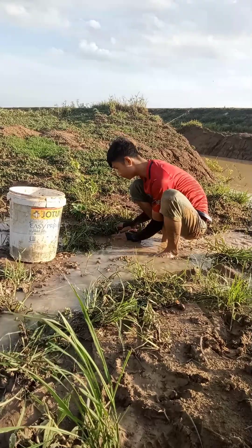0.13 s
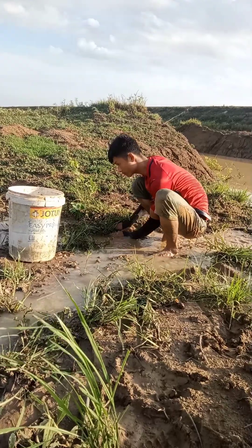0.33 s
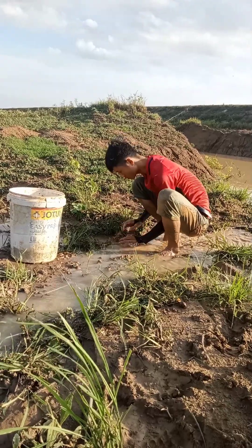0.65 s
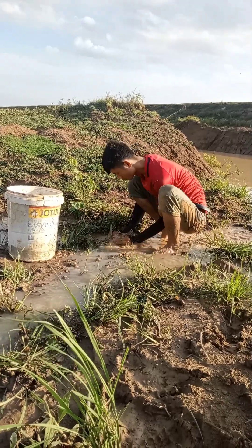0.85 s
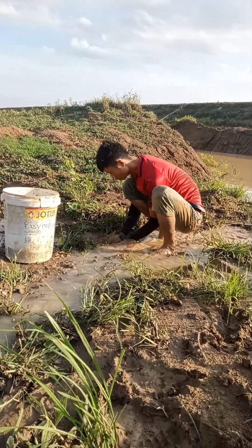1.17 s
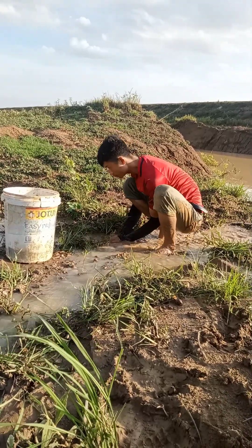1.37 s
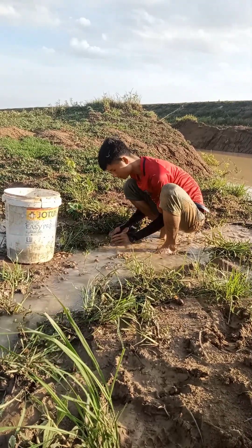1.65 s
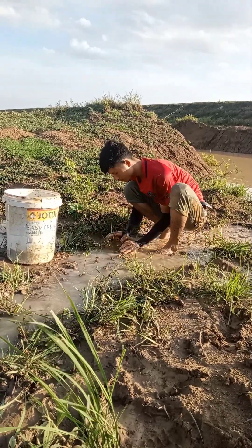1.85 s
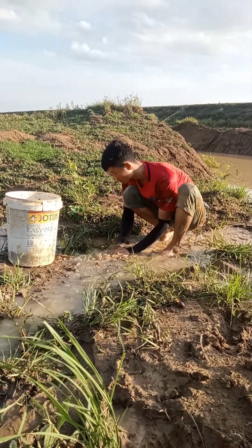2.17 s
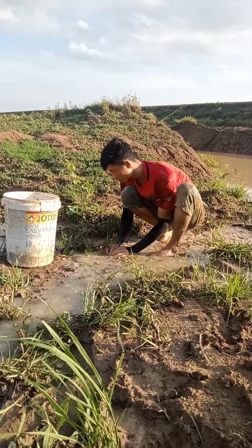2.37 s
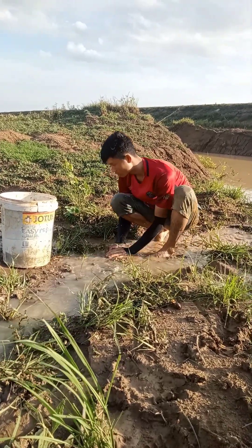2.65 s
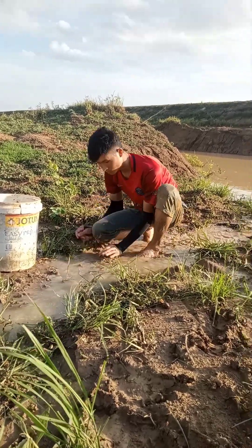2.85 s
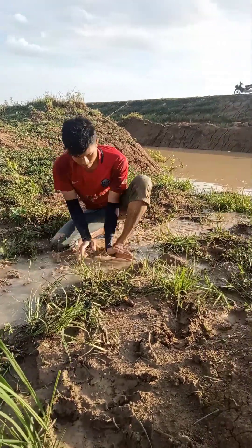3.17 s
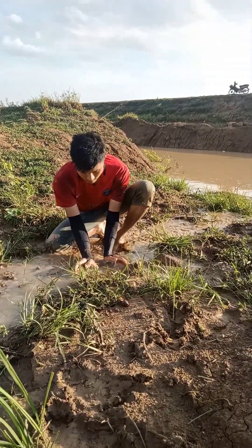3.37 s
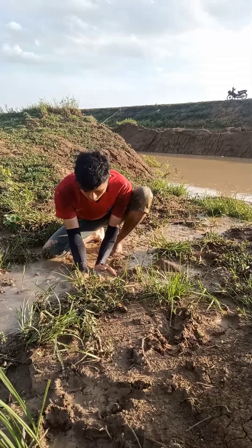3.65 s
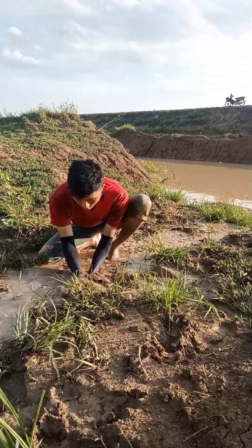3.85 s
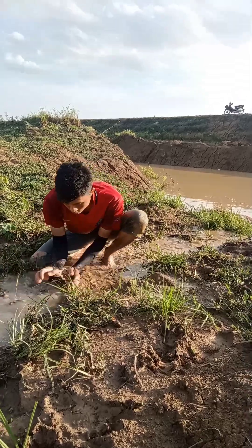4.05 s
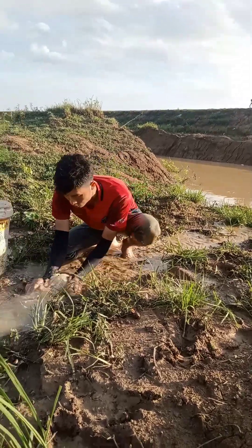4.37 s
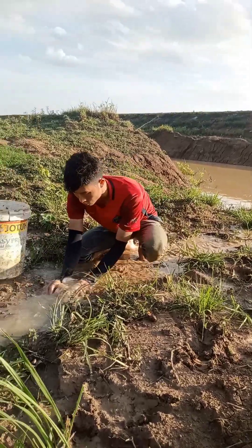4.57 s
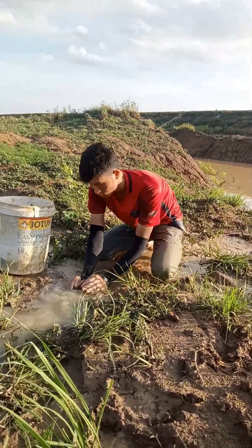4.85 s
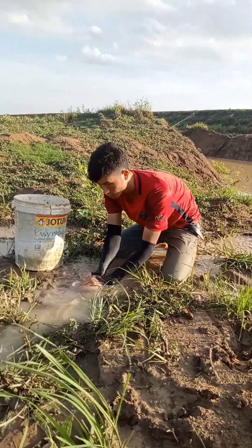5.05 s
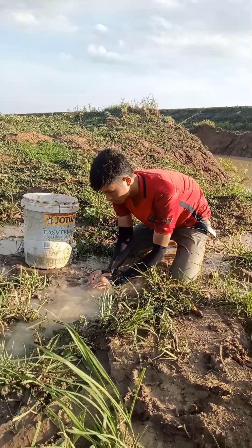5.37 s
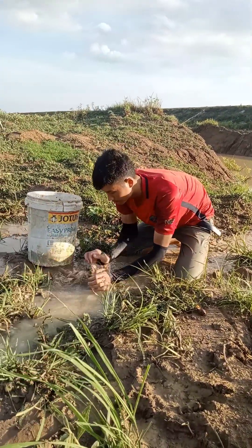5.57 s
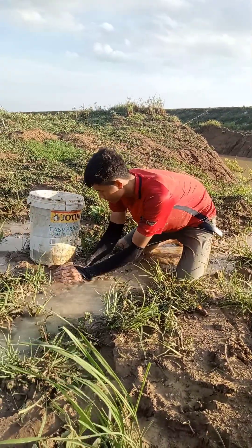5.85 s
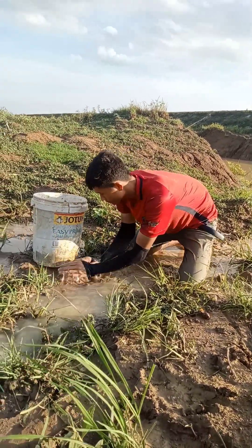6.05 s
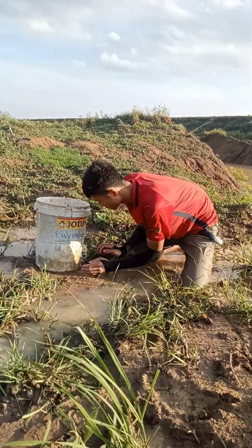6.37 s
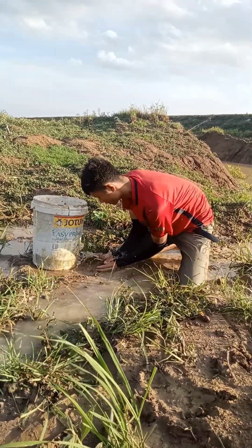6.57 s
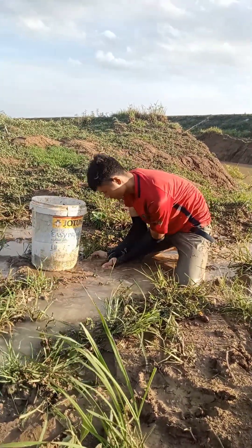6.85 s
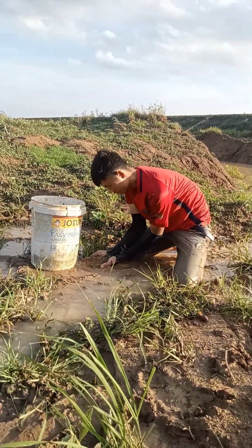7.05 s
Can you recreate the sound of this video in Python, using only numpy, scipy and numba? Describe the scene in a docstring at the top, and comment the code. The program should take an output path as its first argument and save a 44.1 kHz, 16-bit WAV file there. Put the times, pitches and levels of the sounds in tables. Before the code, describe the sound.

Outdoors with no echo, shallow water gurgles quietly under working hands. One bright plink rings out early, then low wind buffeting builds and dominates, easing near three seconds. The water then comes forward with crisp smacks, spatter and bubbly sloshing, fullest past four seconds. More plinks follow near the end among irregular gusts. A thin insect buzz is heard only at the opening. Phone microphone, with little deep bass.

```python
"""Hands scoop and slosh shallow muddy water in an open field, a few metres from a phone in a gusty breeze.
Water: crowds of gliding damped sines (bubbles) over crackling hiss; clear plinks, noise-and-bubble sprays
and unpitched droplet smacks stand out of it.
Wind buffets the microphone port in low thuds: noise through moving low-passes, scaled by draught and puffs.
An insect, a narrow band of noise, buzzes faintly at the start."""
import sys
import numpy as np
from scipy import signal
from scipy.fft import rfft, irfft
from scipy.io import wavfile
from scipy.ndimage import uniform_filter1d
from numba import njit

SR = 44100
rng = np.random.default_rng(int(sys.argv[2]) if len(sys.argv) > 2 else 0)


def how_loud(loudness_db):
    """Turn decibels into a plain amplitude multiplier (0 dB gives 1, 20 dB gives 10)."""
    steps = np.asarray(loudness_db, float) / 20
    return 10 ** steps


def pcm_store(signal):
    """Save signal as 16-bit PCM."""
    levels = np.round(np.clip(np.atleast_2d(signal), -1, 1) * 32767)
    wavfile.write(sys.argv[1], SR, levels.astype(np.int16).T)


N = 318381

# stirred water: [t/s, churn level/dB, fizz over churn/dB]
STIRRING = [(0.0, -46.5, -2), (0.9, -44.5, -2), (1.69, -47.5, 0), (2.09, -45.5, 0), (2.35, -46.5, -2),
            (2.73, -55.5, 3.5), (2.95, -45.5, -4.5), (3.35, -44.5, 4.5), (3.6, -44.5, -3.5), (3.88, -46, 0),
            (4.3, -42.5, -0.5), (4.58, -45.5, -2.5), (5.0, -46, 2), (5.33, -45, -3.5), (5.63, -47, 0),
            (6.51, -44, -3), (7.22, -45.5, -2.5)]
# relative colour of the water at the phone: [f/Hz, gain/dB]
WATER_COLOUR = [(250, -10), (480, 3.5), (800, -3), (1280, -11.5), (1600, -5), (2300, -7), (3100, -2.5),
                (3900, -9.5), (4800, -24), (6600, -24), (8300, -23), (9400, -18.5), (12000, -29),
                (15500, -33)]


def level(x, db):
    """Scale to an rms level in dB."""
    return x * how_loud(db) / np.sqrt(np.mean(x ** 2))


def curves(table):
    """Columns of a table, interpolated to every sample."""
    s, *columns = np.transpose(table)
    return [np.interp(np.arange(N) / SR, s, c) for c in columns]


def walk(rate_hz):
    """Random levels held 1 / rate_hz and slewed twice; spread near 1."""
    k = int(SR / rate_hz)
    held = np.repeat(rng.standard_normal(N // 50), k)[:N]
    return 1.3 * uniform_filter1d(uniform_filter1d(held, k), k)


def waver(spread_db, rate_hz):
    """A walk in dB that keeps the mean power."""
    return spread_db * walk(rate_hz) - spread_db ** 2 * np.log(10) / 20


def colour(x, table):
    """Short causal minimum-phase filter with the gain of (Hz, dB) points."""
    hz, db = np.transpose(table)
    log_hz = np.log(np.linspace(1, SR / 2, 1025))
    log_gain = np.interp(log_hz, np.log(hz), db) * np.log(10) / 20
    # fold the cepstrum onto positive time
    cepstrum = irfft(log_gain)
    cepstrum[1:1024] *= 2
    cepstrum[1025:] = 0
    impulse = irfft(np.exp(rfft(cepstrum)))
    return signal.fftconvolve(x, impulse)[:N]


def tilted_water(db_per_octave):
    """Water colour tilted about 3 kHz."""
    return [(hz, db + db_per_octave * np.log2(hz / 3000)) for hz, db in WATER_COLOUR]


def butter(x, order, hz, kind="low"):
    """Causal Butterworth filter."""
    return signal.sosfilt(signal.butter(order, hz, kind, fs=SR, output="sos"), x)


@njit
def low_pass(x, hz, damp):
    """State-variable low-pass whose corner moves every sample."""
    y, b, l = np.empty(len(x)), 0., 0.
    for i in range(len(x)):
        g = np.tan(np.pi * hz[i] / SR)
        v = (b + g * (x[i] - l)) / (1 + g * (g + damp))
        y[i] = l + g * v
        b, l = 2 * v - b, 2 * y[i] - l
    return y


@njit
def rings(n, s, size, hz, t60, rise, glide):
    """Damped sines that swell within rise seconds; pitch glides by a factor per t60."""
    out = np.zeros(n)
    for k in range(len(s)):
        start, length = int(s[k] * SR), int((t60[k] + rise[k]) * SR)
        phase = 0.
        for i in range(min(length, n - start)):
            t = i / SR
            phase += 2 * np.pi * hz[k] * glide[k] ** (t / t60[k]) / SR
            swell = np.sin(np.pi / 2 * min(t / rise[k], 1.)) ** 2
            decay = 1000. ** (-max(t - rise[k], 0.) / t60[k])
            out[start + i] += size[k] * swell * decay * np.sin(phase)
    return out


def bubbles(count, low_hz, high_hz, cycles, scatter_db):
    """A crowd of small bubbles: many weak, a few strong, each rising in pitch as it nears the surface."""
    when, pitch, strength, life = rng.random((count, 4)).T
    hz = low_hz * (high_hz / low_hz) ** pitch
    t60 = cycles * (0.98 + life) / hz
    # shorter rings get more size so that every pitch carries a like share per Hz
    size = how_loud(-scatter_db * np.log(1 - 0.995 * strength)) * hz / 1000
    return level(rings(N, when * N / SR, size, hz, t60, 0.088 * t60, 1 + 0.44 * life), 0)


def insect():
    """A narrow band of wing rasp, far off in the grass."""
    # buzzes: [start/s, end/s]
    buzzes = [(0, 0.056), (.13, .33)]
    centre_hz, width_hz, rasp_db = 8200, 520, -63
    t = np.arange(N) / SR
    on = sum((t >= a) * (t < b) for a, b in buzzes) * 1.0
    on = uniform_filter1d(on, int(0.01 * SR))
    edges_hz = [centre_hz - width_hz / 2, centre_hz + width_hz / 2]
    rasp = butter(rng.standard_normal(N), 2, edges_hz, "band")
    return on * level(rasp, rasp_db)


def wind():
    """Turbulence at the port: a draught with puffs on top; quicker eddies lift the corner of the rumble."""
    # strongest puffs on the port: [centre t/s, level/dB, length/s]
    puffs = [(0.113, -27, 0.021), (0.449, -32.5, 0.038), (0.715, -16, 0.021), (0.81, -26, 0.05),
             (0.903, -12.5, 0.012), (1.045, -15.5, 0.04), (1.131, -19.5, 0.013), (1.2, -12, 0.029),
             (1.272, -18.5, 0.017), (1.381, -15.5, 0.029), (1.486, -27, 0.018), (1.571, -22.5, 0.028),
             (1.63, -13, 0.0076), (1.662, -15, 0.033), (1.727, -16, 0.032), (1.869, -18.5, 0.074),
             (1.987, -20.5, 0.052), (2.059, -17.5, 0.038), (2.211, -16.5, 0.017), (2.227, -12, 0.0094),
             (2.268, -14.5, 0.022), (2.352, -9, 0.037), (2.411, -12.5, 0.024), (2.454, -16.5, 0.0074),
             (2.52, -11, 0.017), (2.545, -10, 0.013), (2.57, -8.5, 0.016), (2.611, -15, 0.017),
             (2.767, -26, 0.017), (3.211, -22, 0.045), (3.425, -36, 0.013), (3.511, -20.5, 0.026),
             (3.633, -27.5, 0.081), (3.779, -17.5, 0.02), (4.169, -17.5, 0.012), (4.238, -17, 0.005),
             (4.24, -18, 0.037), (4.323, -17.5, 0.034), (4.569, -13, 0.0094), (4.664, -25, 0.1),
             (4.739, -23.5, 0.012), (5.12, -11.5, 0.038), (5.37, -23, 0.068), (5.517, -14.5, 0.028),
             (5.551, -16.5, 0.016), (5.618, -19.5, 0.024), (5.669, -10.5, 0.05), (5.684, -8, 0.0095),
             (5.765, -14.5, 0.024), (5.851, -18.5, 0.058), (5.888, -16.5, 0.0084), (5.907, -9, 0.02),
             (6.028, -23.5, 0.0058), (6.081, -16.5, 0.018), (6.234, -13.5, 0.047), (6.301, -18, 0.0075),
             (6.402, -18, 0.023), (6.53, -6.5, 0.024), (6.728, -22.5, 0.01), (6.79, -19, 0.077),
             (6.933, -22.5, 0.017), (7.062, -18.5, 0.016), (7.161, -11.5, 0.015), (7.201, -18.5, 0.02)]
    # breeze over the port: [t/s, steady draught level/dB, small quick eddies in the puffs/dB]
    draught = [(0.0, -49, -27), (0.66, -46, -21), (0.95, -31.5, -16.5), (1.62, -24, -8), (1.95, -26, -17.5),
               (2.2, -21, -7.5), (2.4, -30.5, -15), (2.57, -17, -1), (2.8, -33, -19.5), (3.01, -42, -29),
               (3.5, -33, -22.5), (3.92, -30, -24.5), (4.2, -21, -9.5), (4.54, -23, -15.5),
               (4.78, -42, -20), (5.25, -37.5, -15.5), (5.4, -24.5, -13), (5.9, -34.5, -10),
               (6.3, -28.5, -13), (7.02, -36.5, -15), (7.22, -33, -10)]
    draught_quick_db, rumble_db, flutter_db = -16, -53, 2.5
    # puff shape, in puff lengths: sharpness of the front, power and fading of the wake
    puff_sharp, wake_share, wake_fade = 2.14, 0.12, 1.76
    port_cut_hz, cavity_hz = 78.2, 850

    draught_db, eddy_db = curves(draught)
    draught_db = draught_db + waver(3.5, 35)
    power = how_loud(draught_db) ** 2
    # power-weighted eddy dB; a stronger draught sheds more small eddies
    quick = power * (draught_quick_db + 0.65 * (draught_db + 24.0))
    t = np.arange(N) / SR
    for s, db, length in puffs:
        near = slice(max(int((s - 2 * length) * SR), 0), int((s + 4 * length) * SR))
        age = (t[near] - s) / length
        # a peaked front, then the wake
        front = np.exp(-(puff_sharp * age) ** 2)
        wake = wake_share * (age > 0) * (1 - np.exp(-3 * age ** 2)) * np.exp(-wake_fade * age)
        puff = how_loud(db) ** 2 * (front + wake)
        power[near] += puff
        # short puffs are sharper
        quick[near] += puff * (eddy_db[near] + 2.06 * np.log2(0.026 / length))

    corner_hz = np.clip(420 * how_loud(0.57 * quick / power), 60, 900)
    eddies = low_pass(rng.standard_normal(N), 0.77 * corner_hz, 1.6)
    eddies = low_pass(eddies, 1.655 * corner_hz, 1.0)
    eddies = butter(eddies, 2, port_cut_hz, "high")
    # even out the swings, so that the air speed alone sets their strength
    window = int(0.024 * SR)
    eddies /= np.sqrt(uniform_filter1d(uniform_filter1d(eddies ** 2, window), window))
    # the largest swings overshoot into sharp spikes
    eddies = level(np.sinh(0.6 * eddies), 0)
    # the port cavity smooths the quickest swings
    eddies = butter(eddies, 3, cavity_hz)
    far = butter(rng.standard_normal(N), 2, 110)
    # the puffs break up into quick flutters
    return eddies * np.sqrt(power) * how_loud(waver(flutter_db, 90)) + level(far, rumble_db)


def ticks():
    """Droplet smacks: dry broad unpitched cracks; random weaker ones are stronger where the churn is loud."""
    # single droplets smacking mud or skin: [t/s, envelope peak before the noise level/dB]
    smacks = [(2.1774, -32), (3.0649, -22), (3.3603, -27), (3.4265, -26), (3.6546, -24), (3.9739, -23.5),
              (4.118, -21), (4.2515, -23.5), (4.3527, -28), (4.4075, -21.5), (5.072, -26), (5.583, -29),
              (5.6301, -25), (5.6475, -22), (6.266, -31), (6.4384, -37)]
    decay_s, stray_db, noise_db = 0.0018, -36.5, -7.0
    when, strength = rng.random((260, 2)).T
    at = (when * (N - 1)).astype(int)
    churn_db = curves(STIRRING)[0][at]
    strays_db = stray_db + churn_db + 45 - 3.0 * np.log(1 - 0.97 * strength)
    s, peak_db = np.transpose(smacks)
    hits = np.zeros(N)
    hits[np.r_[at, (s * SR).astype(int)]] = how_loud(np.r_[strays_db, peak_db])
    shape = signal.lfilter([1], [1, -np.exp(-1 / (decay_s * SR))], hits)
    return shape * level(colour(rng.standard_normal(N), tilted_water(2.23)), noise_db)


def sprays():
    """Short bursts of droplets: a quick front, a crackling tail."""
    # water flung off the hands: [t/s, envelope peak/dB, length/s]
    bursts = [(0.192, -40, 0.019), (0.838, -37, 0.015), (0.854, -23.5, 0.0046), (1.939, -36, 0.027),
              (1.944, -21, 0.0027), (2.993, -43.5, 0.11), (3.223, -43.5, 0.034), (3.252, -34, 0.02),
              (3.467, -39.5, 0.025), (4.124, -41.5, 0.026), (4.358, -36.5, 0.029), (4.42, -54, 0.025),
              (4.949, -34.5, 0.025), (5.752, -28.5, 0.014), (6.5106, -36.5, 0.027)]
    t, shape = np.arange(N) / SR, np.zeros(N)
    for s, peak_db, length in bursts:
        age = np.clip((t - s) / length, -6, 12)
        shape += how_loud(peak_db) * np.where(age < 0, np.exp(-(3 * age) ** 2), np.exp(-age))
    crackle = rng.standard_normal(N) * how_loud(3.5 * walk(400))
    beads = bubbles(count=3500, low_hz=1500, high_hz=15000, cycles=24., scatter_db=3.0)
    droplets = level(crackle, -4) + beads
    return shape * level(colour(droplets, tilted_water(4.7)), 1.0)


def plinks():
    """Each drop lands with a snap, traps one clear bubble and spatters weaker ones of other sizes after it."""
    # clearest bubbles trapped by drops and fingers: [t/s, peak/dB, f/Hz]
    landings = [(0.724, -36, 1080), (0.8543, -5, 3040), (0.94, -33, 1630), (1.056, -28, 3010),
                (1.334, -36, 12000), (1.42, -25.5, 2820), (1.971, -30, 4050), (2.145, -24, 483),
                (3.008, -25, 2230), (3.064, -32.5, 875), (3.083, -31.5, 2270), (3.236, -33, 10500),
                (3.253, -22, 3440), (3.488, -34, 11100), (3.566, -27, 3020), (3.789, -33, 870),
                (3.986, -35.5, 1390), (4.353, -19.5, 2050), (4.354, -23.5, 2960), (4.418, -36, 3430),
                (4.512, -31, 720), (4.519, -25, 2230), (4.628, -33.5, 2200), (4.945, -28, 4130),
                (5.582, -21, 2400), (5.582, -25, 1180), (5.758, -20, 3920), (5.775, -19.5, 3050),
                (5.851, -30.5, 1550), (5.866, -44, 1530), (5.879, -40, 1460), (5.912, -32, 3100),
                (5.922, -34, 3050), (6.512, -27.5, 4230), (6.861, -23.5, 535), (6.898, -32.5, 2220),
                (7.062, -35, 1185)]
    snap_db, spatter_db, spatter_s = -15, -5, 0.066
    s, peak_db, hz = np.transpose(landings)
    # big bubbles ring longer and rise further; hard landings break them sooner
    t60 = 0.019 * (3000 / hz) ** 0.57 * how_loud(-0.25 * (np.minimum(peak_db, -18) + 23))
    out = rings(N, s, how_loud(peak_db), hz, t60, 0.06 * t60, 1 + 0.28 * np.minimum(900 / hz, 1))
    snap_size = how_loud(0.75 * peak_db + snap_db)
    out += rings(N, s, snap_size, 1.42 * hz, 0.067 * t60, 0.022 * t60, np.ones(len(s)))
    # six weaker bubbles per landing
    for lag, size, detune in rng.random((len(s), 3, 6)).T:
        late = s + 0.003 + spatter_s * lag ** 2
        weak = how_loud(0.65 * peak_db + spatter_db - 10.0 * size - 48.0 * lag)
        late_hz = np.minimum(hz, 3300) * 2.03 ** (detune - 0.5)
        out += rings(N, late, weak, late_hz, 0.93 * t60, 0.029 * t60, 1 + 0.21 * size)
    return out


def churn():
    """Gurgle and fizz of the stirred puddle: crowds of bubbles over a wet hiss that crackles as films burst."""
    drips_db, patter_db = -12, -2.5  # against the low crowd
    churn_db, fizz_db = curves(STIRRING)
    hiss = rng.standard_normal(N) * how_loud(2.5 * walk(300))
    low_hiss = butter(hiss, 4, 5200)
    low = bubbles(count=4800, low_hz=350, high_hz=5000, cycles=46., scatter_db=3.0)
    low = low + how_loud(-5.5) * low_hiss * how_loud(4.0 * walk(45))
    high = bubbles(count=5500, low_hz=4000, high_hz=15500, cycles=60., scatter_db=2.8)
    high = high + how_loud(-1.0) * (hiss - low_hiss) * how_loud(2.2 * walk(45))
    # stray drips plink here and there, coarse droplets patter in clumps
    drips = bubbles(count=110, low_hz=600, high_hz=4500, cycles=30., scatter_db=2.0)
    patter = bubbles(count=1300, low_hz=900, high_hz=4500, cycles=14., scatter_db=3.5)
    patter = patter * how_loud(waver(4, 12))
    low = low + how_loud(drips_db) * drips + how_loud(patter_db) * patter
    gurgle = level(colour(low, WATER_COLOUR), 0)
    fizz = level(colour(high, WATER_COLOUR), 0)
    return how_loud(churn_db) * (gurgle + how_loud(fizz_db) * fizz)


def scene():
    """Open air: nothing echoes."""
    return (insect() + wind() + ticks() + sprays() + plinks() + churn())[None]


def roll_off(x):
    """The treble ends steeply here."""
    return signal.sosfilt(signal.butter(12, 16490, fs=SR, output="sos"), x)


def record(dry):
    """The phone cuts the deepest bass and the top."""
    mic_cut_hz, top_hz = 92, 15750
    band = butter(dry, 2, mic_cut_hz, "high")
    band = signal.sosfilt(signal.ellip(8, 0.2, 70, top_hz, fs=SR, output="sos"), band)
    return roll_off(band)


dry = scene()
out = record(dry)
pcm_store(out)
```